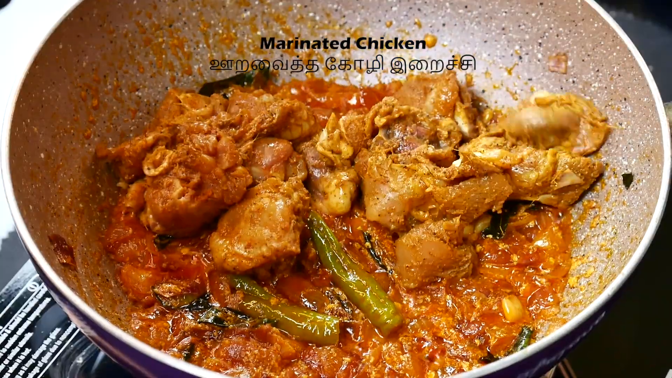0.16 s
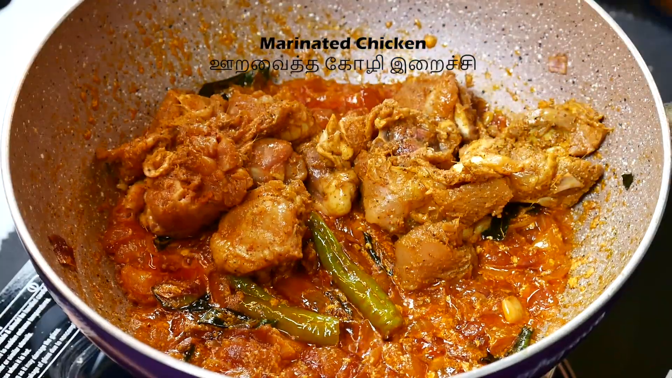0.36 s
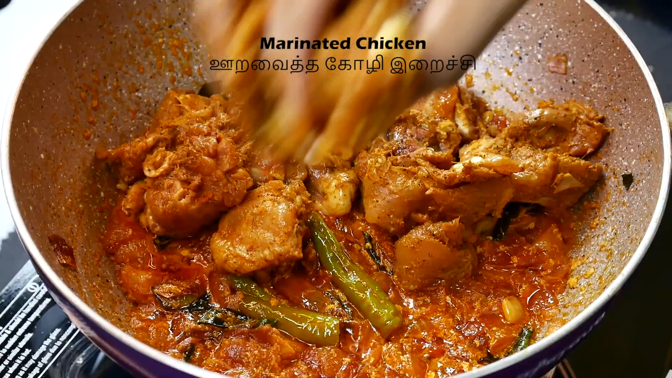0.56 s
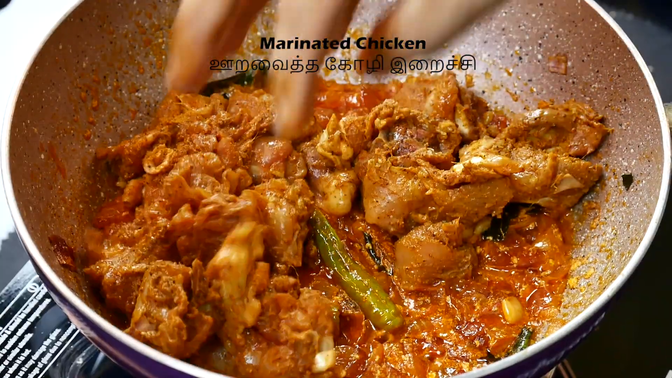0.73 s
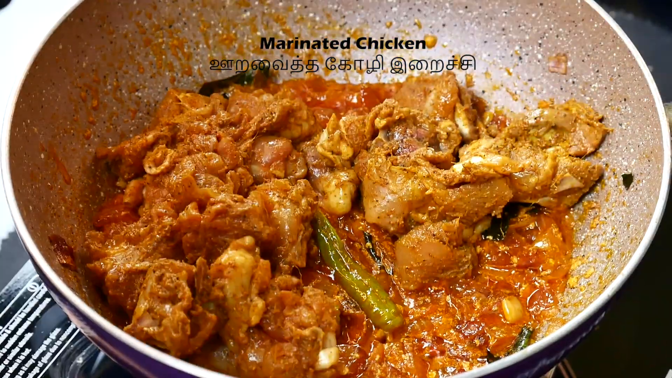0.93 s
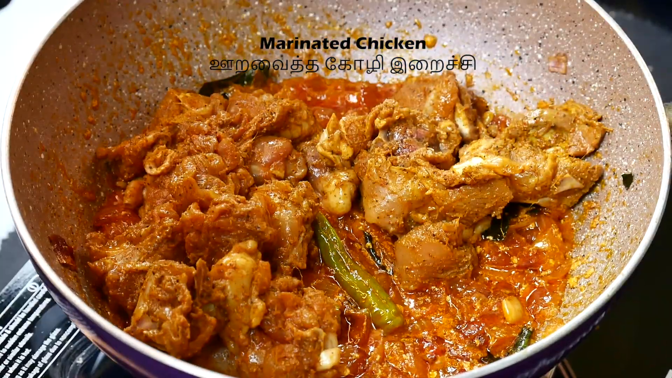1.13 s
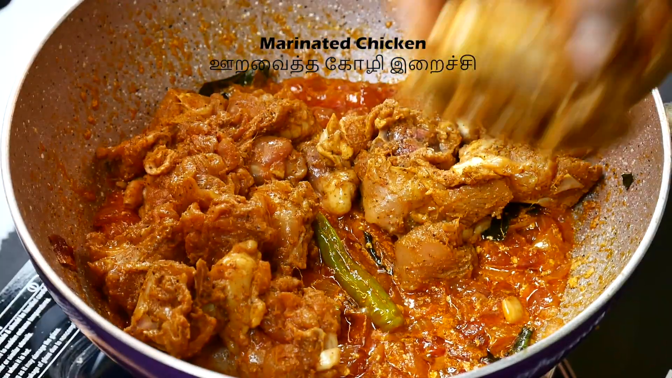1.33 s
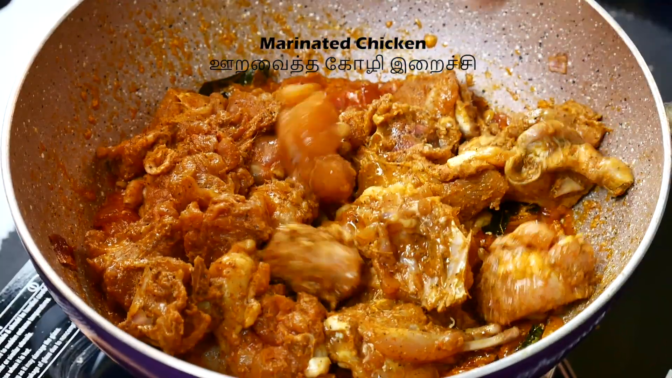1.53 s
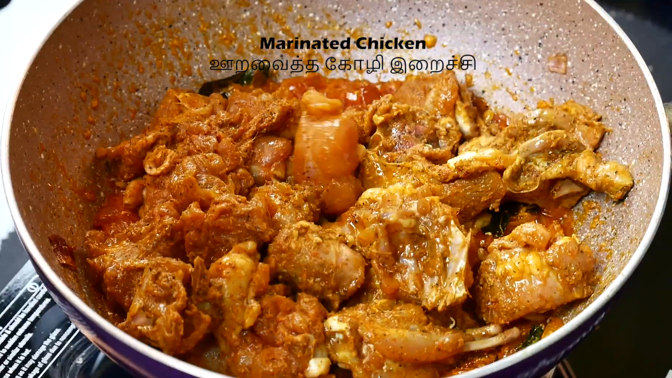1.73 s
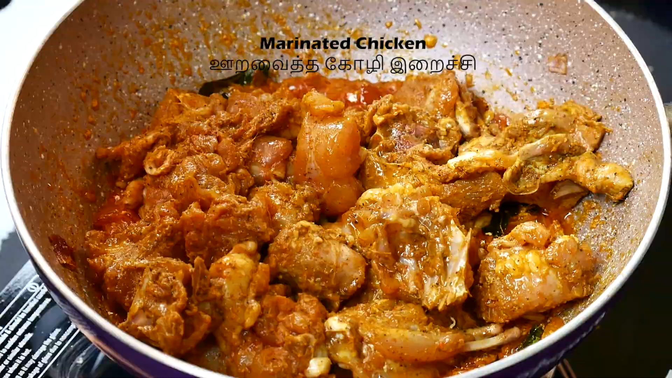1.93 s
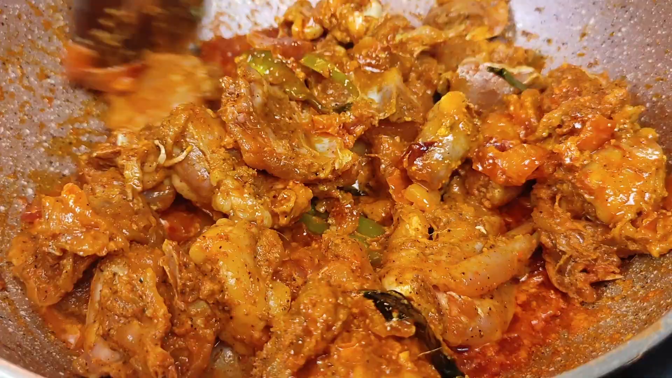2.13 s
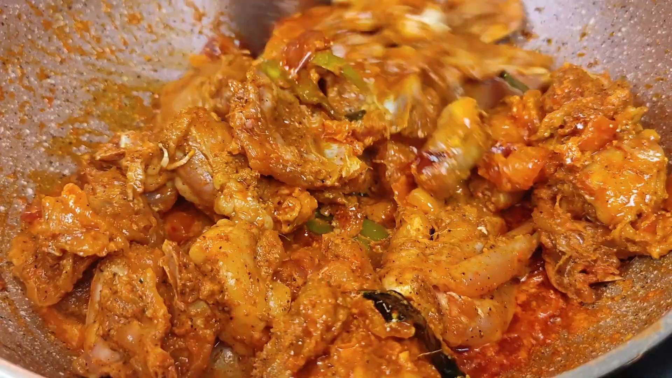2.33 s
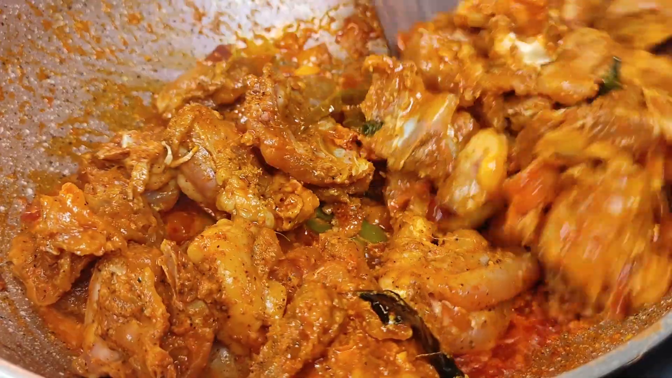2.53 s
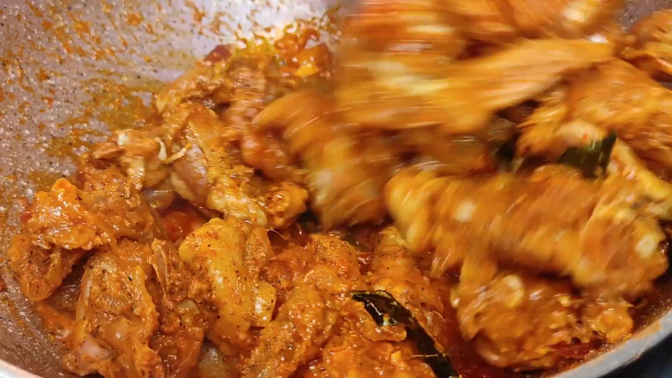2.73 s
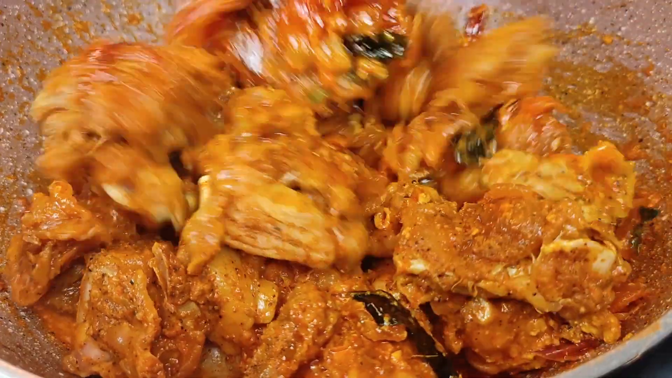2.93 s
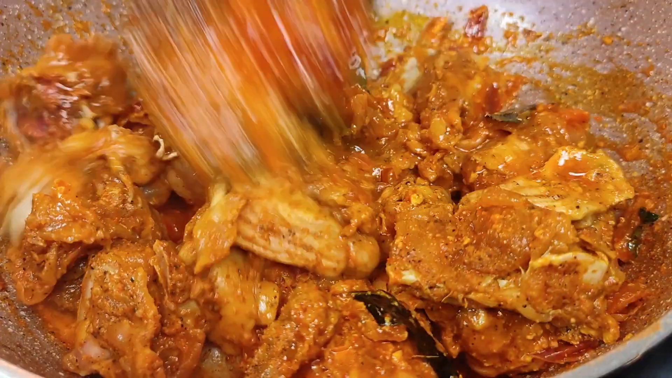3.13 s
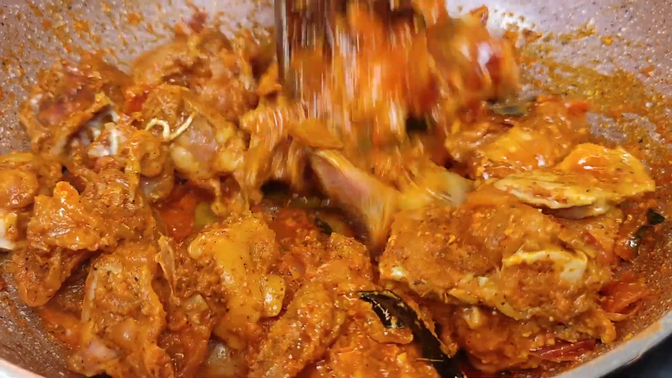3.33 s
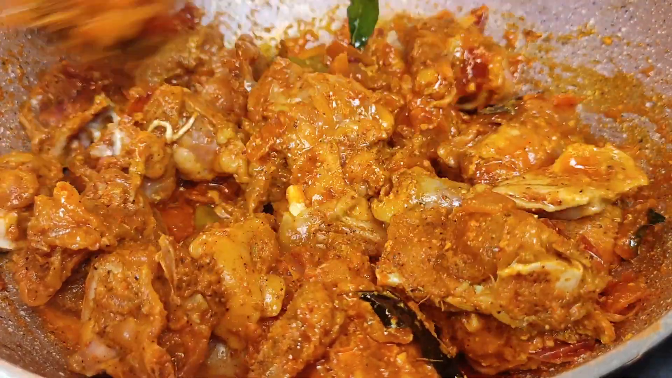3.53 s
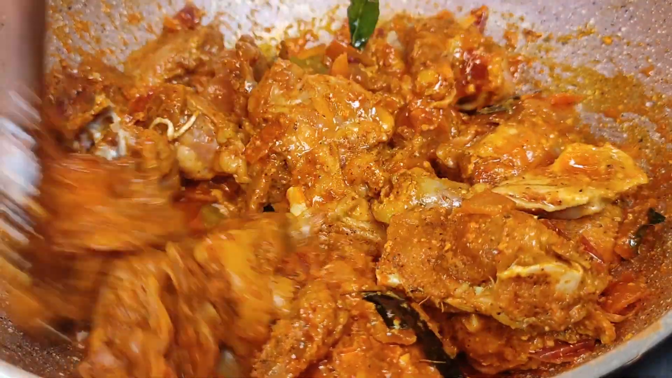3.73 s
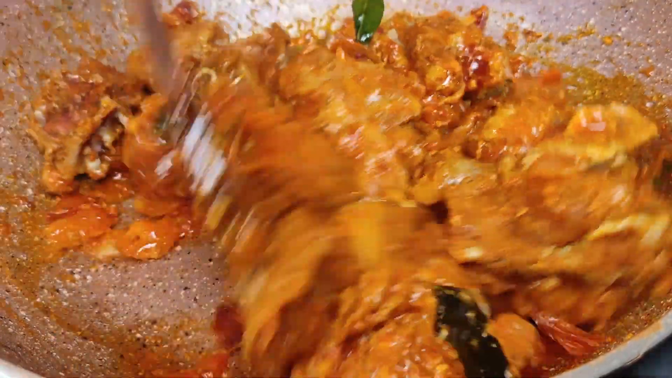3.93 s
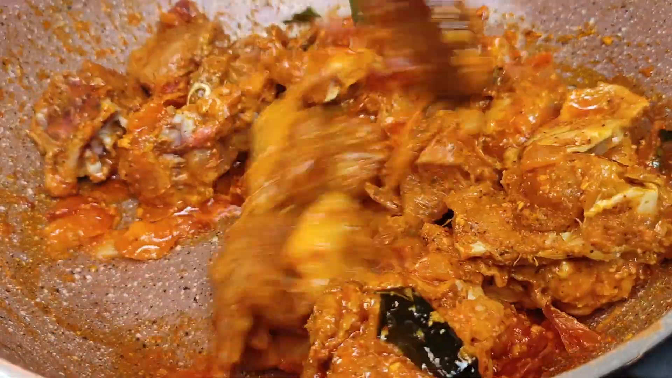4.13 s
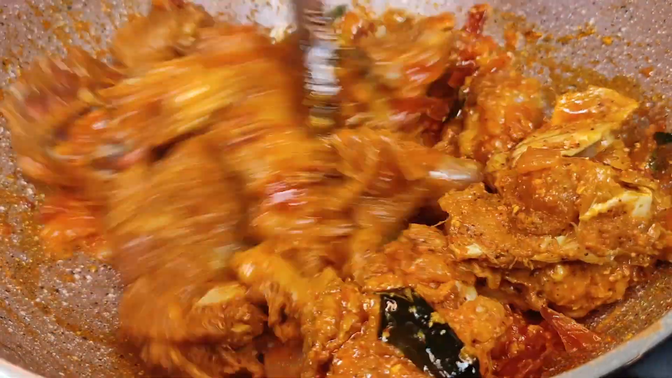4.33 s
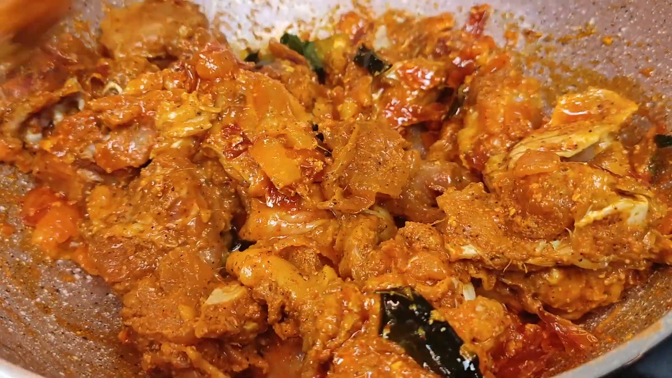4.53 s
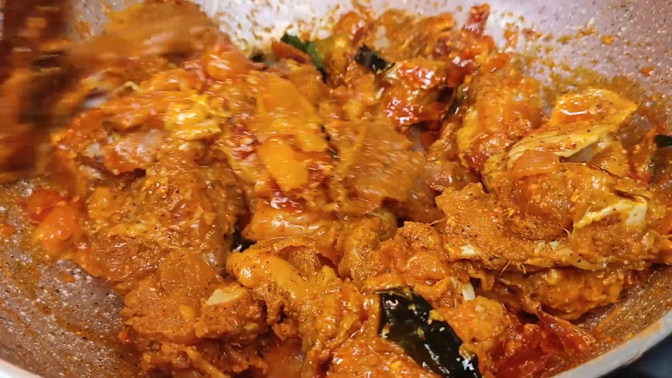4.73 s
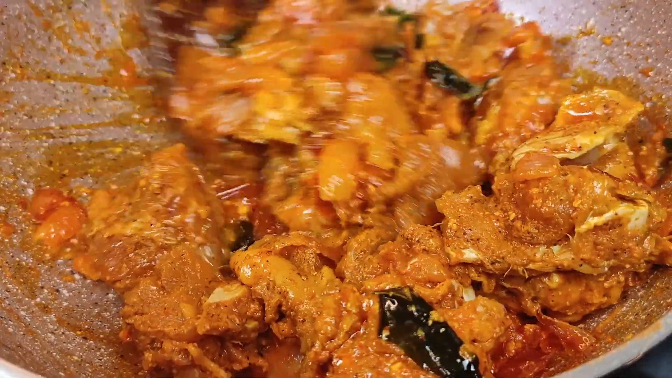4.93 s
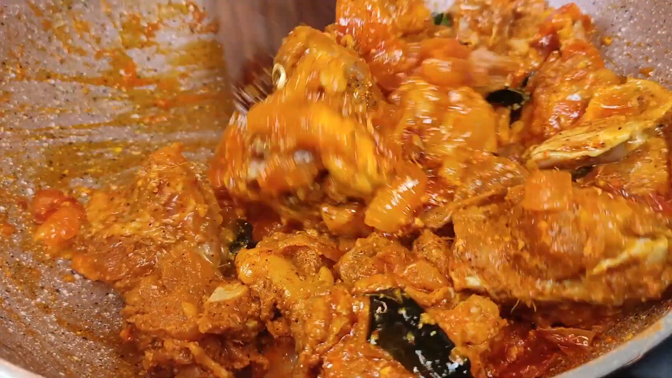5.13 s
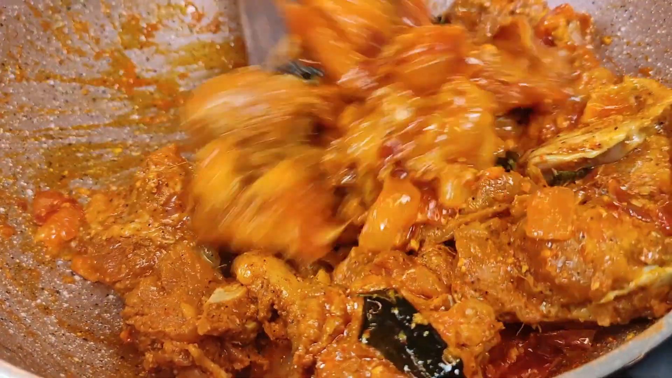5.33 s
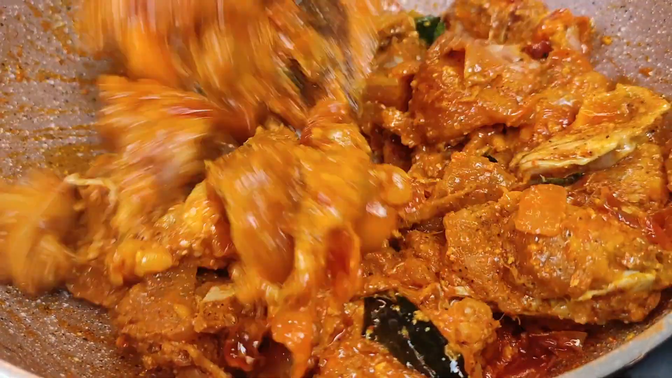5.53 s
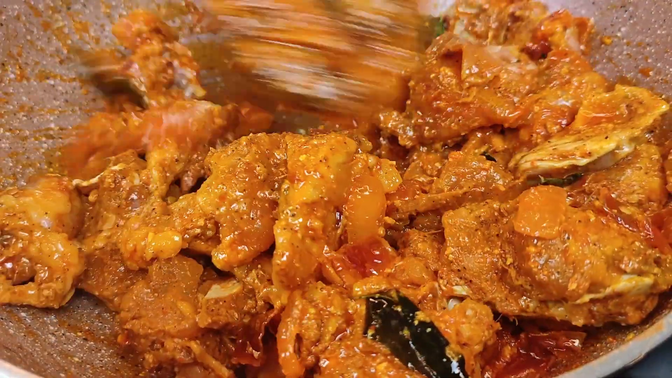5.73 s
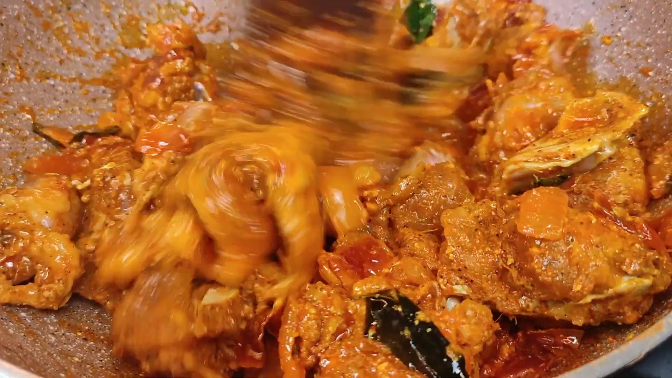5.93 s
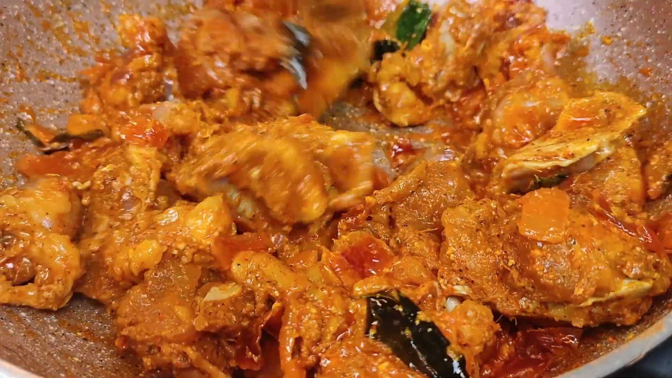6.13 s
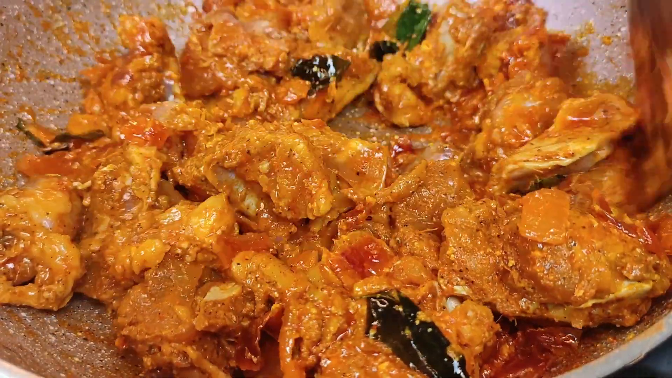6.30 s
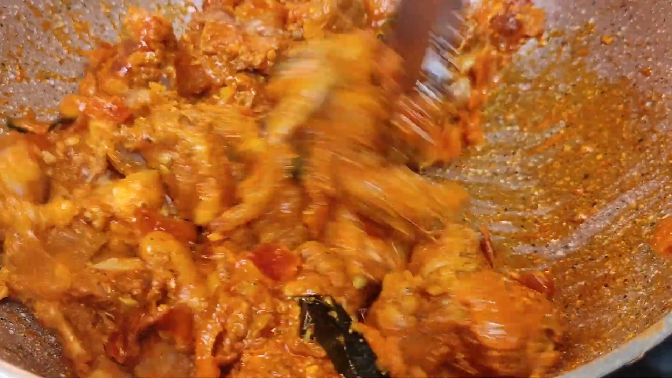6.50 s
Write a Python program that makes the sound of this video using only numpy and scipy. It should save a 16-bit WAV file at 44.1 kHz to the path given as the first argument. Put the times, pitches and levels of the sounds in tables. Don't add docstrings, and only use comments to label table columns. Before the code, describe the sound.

Close wet plops of meat landing in oily sauce, followed by dull wooden knocks and pan scrapes amid increasingly lively, crackling frying and a low hum.

```python
import sys
import numpy as np
from scipy import signal
from scipy.fft import rfft, irfft, next_fast_len
from scipy.io import wavfile

SR = 44100
rng = np.random.default_rng(int(sys.argv[2]) if len(sys.argv) > 2 else 0)


def to_wav(sig):
    pcm = np.clip(np.atleast_2d(sig), -1, 1) * 32767
    pcm = np.round(pcm).astype(np.int16)
    wavfile.write(sys.argv[1], SR, pcm.T)


def amplitude_ratio(level_db):
    exponent = np.asarray(level_db, float) / 20
    return 10 ** exponent


N = 293706


def rms_one(x):
    return x / np.sqrt(np.mean(x ** 2) + 1e-20)


def in_time(rows):
    s, *columns = np.transpose(rows)
    return np.array([np.interp(np.arange(N) / SR, s, c) for c in columns])


def at_hz(points, hz):
    points_hz, points_db = np.transpose(points)
    return np.interp(np.log(hz), np.log(points_hz), points_db)


def coloured(x, spectrum):
    hz = np.maximum(np.fft.rfftfreq(N, 1 / SR), 1)
    return irfft(rfft(x) * amplitude_ratio(at_hz(spectrum, hz)), N)


def shares(centres, hz):
    return np.array([np.interp(np.log(hz), np.log(centres), row) for row in np.eye(len(centres))])


def drift(rate_hz):
    r = np.exp(-2 * np.pi * rate_hz * 40 / SR)
    slow = signal.lfilter([1], [1, -2 * r, r * r], rng.standard_normal(N // 40 + 2002))
    slow = slow[2000:]
    return np.interp(np.arange(N) / 40, np.arange(len(slow)), rms_one(slow - slow.mean()))


def ring(clicks, hz, t60):
    r = np.exp(-np.log(1000) / (t60 * SR))
    w = 2 * np.pi * hz / SR
    return signal.lfilter([0, np.sin(w)], [1, -2 * r * np.cos(w), r * r], clicks + 1e-18)


def band(x, low_hz, high_hz):
    return signal.sosfilt(signal.butter(2, [low_hz, high_hz], "band", fs=SR, output="sos"), x)


def grains(per_s, spread_db):
    where, chance, size, sign = rng.random((4, N // 4))
    kept = chance < per_s * 4 / SR
    out = np.zeros(N)
    height = amplitude_ratio(-spread_db * np.log(size[kept] + 0.0042))
    out[(where[kept] * N).astype(int)] = height * np.sign(sign[kept] - .5)
    return rms_one(out)


# pitch in Hz, level in dB per Hz.
ROAR_COLOUR = [(18, -60), (30, -28), (70, -30), (97, -41), (171, -24), (208, -11.5), (413, -7.5),
               (471, -25), (517, -8.5), (552, -3), (700, -6), (910, -65), (1540, -120)]
ROAR_DB = -53
FAN_HZ, FAN_WIDTH_HZ, FAN_DB = 99, 38, -63.5


def hum():
    roar = rms_one(coloured(rng.standard_normal(N), ROAR_COLOUR))
    drone = rms_one(ring(rng.standard_normal(N), FAN_HZ, 0.81 / FAN_WIDTH_HZ))
    return amplitude_ratio(ROAR_DB + 1.0 * drift(1.9)) * roar + amplitude_ratio(FAN_DB) * drone


KITCHEN_T60_S, WALL_CUT_HZ = 0.24, 5000


def kitchen(x):
    size = next_fast_len(N + SR)
    phase = -2j * np.pi * np.fft.rfftfreq(size)
    dull = np.exp(-2 * np.pi * WALL_CUT_HZ / SR)
    wall = (1 - dull) / (1 - dull * np.exp(phase))
    echo = 0
    for k, lag in enumerate((rng.uniform(.008, .035, 10) * SR).astype(int)):
        fade = np.exp(-np.log(1000) * lag / SR / KITCHEN_T60_S)
        loop = fade * wall * np.exp(phase * lag)
        echo = echo + (-1) ** k * loop / (1 - loop)
    return irfft(rfft(x, size) * echo, size)[:N]


# time in seconds, vigour in dB, sauce thickness in dB.
FRY = [(0.0, -37.5, -2), (0.24, -37, -1), (0.39, -38.5, -1), (1.5, -41, 0.5), (1.65, -39, 0.5),
       (2.19, -41, 0.5), (2.47, -33, -0.5), (2.65, -32.5, 4), (3.52, -29.5, 1), (3.88, -26, 0.5),
       (4.38, -29, 0.5), (4.6, -28, 0), (5.27, -26.5, 1), (5.43, -28, 0), (6.05, -28.5, 0.5),
       (6.23, -28, 2), (6.66, -27.5, -0.5)]
SIZE_HZ = [900, 2000, 3500, 8000]
VIGOUR_SHARE = [.7, 1.035, 1.025, 0.98]
THICKNESS_SHARE = [1.0, .3, 0.0, -1.0]
# middle in seconds, half length in seconds, change in dB, pitch in Hz of the bubbles most affected.
FLARES = [(2.4, 0.038, 7, 980), (2.81, 0.16, 7, 7900), (2.947, 0.11, -7, 1740), (3.1, 0.13, 5.5, 7000),
          (2.9, 0.11, 1, 2140), (3.72, 0.053, 1, 8000), (3.87, 0.14, -3, 2100), (4.5, 0.07, 4.5, 4970),
          (4.665, 0.072, 5.5, 5900), (4.675, 0.057, 3, 2000), (3.45, 0.11, 2, 4900), (3.9, 0.1, 0, 3700),
          (4.53, 0.042, 2, 4000), (3.72, .08, -1.5, 1800), (2.49, 0.048, -6, 2000), (2.39, .1, -2, 11000),
          (4.4, .08, -0.5, 6900), (3.6, .06, -2, 11000), (4.6, 0.019, 5, 2300), (5.313, 0.058, 3, 5000),
          (5.453, 0.15, -2, 4000), (5.77, 0.04, 5.5, 1223), (5.8, 0.072, 1, 6300), (6.164, 0.053, 3, 3500),
          (6.457, 0.062, -0.5, 4000)]
FLARE_REACH_OCTAVES = 0.93


def bubble_sizes():
    vigour_db, thickness_db = in_time(FRY)
    out = np.outer(VIGOUR_SHARE, vigour_db) + np.outer(THICKNESS_SHARE, thickness_db)
    t = np.arange(N) / SR
    for s, half, db, hz in FLARES:
        octaves = np.log2(np.divide(SIZE_HZ, hz))
        reach = np.exp(-(octaves / FLARE_REACH_OCTAVES) ** 2)
        out += db * np.outer(reach, np.exp(-((t - s) / half) ** 2))
    return out


# pitch in Hz, level in dB per Hz.
FRY_COLOUR = [(330, -35), (500, -19.5), (570, -17), (667, -17), (830, -4.5), (1150, -4), (1600, -7.5),
              (2150, -3.5), (2550, -4), (3250, -1.5), (3800, -5.5), (5500, -12), (9300, -22.5),
              (15600, -29)]
CHANCE_SWELL = .4


def frying(per_cycle, spread_db, hiss, crackle, patchy_db):
    lively = slice(int(4.2 * SR), int(6 * SR))
    sizes_db, together = bubble_sizes(), drift(3.0)
    sizes_db = sizes_db - sizes_db[:, lively].mean(axis=1, keepdims=True)
    snaps = crackle * grains(500, spread_db=3.0)
    steam = hiss * rng.standard_normal((2, N)) + snaps
    edges = 420 * 2 ** np.arange(0, 5.45, .2)
    out = 0
    for k, (low, high) in enumerate(zip(edges, edges[1:])):
        hz = np.sqrt(low * high)
        patches_db = patchy_db * (CHANCE_SWELL * together + drift(11.3))
        level_db = shares(SIZE_HZ, hz) @ sizes_db + patches_db
        bubbles = grains(per_cycle * hz, spread_db)
        out = out + amplitude_ratio(level_db) * band(bubbles + steam[k % 2], low, high)
    out = coloured(out, FRY_COLOUR)
    return amplitude_ratio(-27.0) * out / np.std(out[lively])


# start in seconds, peak in dB, pitch in Hz, spray in dB.
SPITS = [(0.0387, -21, 2160, -2), (0.0442, -13.5, 2300, -5.5), (0.131, -27, 3340, -15),
         (0.2294, -27, 4530, 1), (0.244, -20, 4000, -16), (0.4326, -24, 3900, -24), (0.600, -38, 3280, 9),
         (0.6375, -19.5, 3380, -20), (2.0714, -23, 2740, -12), (2.191, -18.5, 2893, -36),
         (2.4244, -13.5, 3040, -26), (2.5116, -20, 3480, -21), (3.024, -26, 3480, -0.5),
         (3.053, -9, 1945, -11), (4.5254, -21, 3260, -27), (6.0676, -11, 3640, -29)]
SPIT_DYING_S = 0.018
# start in seconds, peak in dB, splash length in seconds, spray in dB, pitch in Hz of the biggest pocket.
SLAPS = [
    (.0536, -21.5, 0.067, -1.5, 3320),
    (0.7359, -9.5, .031, -24, 2000),
    (1.4707, -12.5, .054, -13, 3400),
]
# share of its length, level in dB, pitch in Hz, dying time in seconds.
SPLASH = [(0, -2, 3430, 0.032), (0.139, -5, 3470, 0.065), (.48, -6, 3240, 0.036), (0.992, -12, 3400, 0.059)]
POCKET_AT, POCKET_DB, POCKET_DYING_S = .28, -3, 0.032


def bursts():
    rows = [(s, db, hz, SPIT_DYING_S, spray_db) for s, db, hz, spray_db in SPITS]
    for s, peak_db, length, spray_db, pocket_hz in SLAPS:
        pops = SPLASH + [(POCKET_AT, POCKET_DB, pocket_hz, POCKET_DYING_S)]
        rows += [(s + share * length, peak_db + db, hz, dying, spray_db) for share, db, hz, dying in pops]
    return rows


SPRAY_OUTLASTS = .5


def spits(cycles):
    out, t = np.zeros(N), np.arange(5000) / SR
    opening = 1 - np.exp(-t / .001)
    rows = bursts()
    for (s, peak_db, hz, dying, spray_db), drops in zip(rows, rng.standard_normal((len(rows), len(t)))):
        fade = np.exp(-np.log(1000) * t / max(dying, .002))
        pop = fade * rms_one(ring(drops, hz, cycles / hz))
        spray = amplitude_ratio(spray_db) * fade ** SPRAY_OUTLASTS * rms_one(band(drops, 1400, 5400))
        out[round(s * SR):][:len(t)] += amplitude_ratio(peak_db - 5.0) * (pop + spray) * opening
    return out


# start in seconds, length in seconds, dB above the resting load.
STROKES = [
    (0.0, 0.22, 7.5),
    (1.598, 0.085, 4.5),
    (2.35, 0.12, 5.5),
    (2.95, 0.14, 8),
    (3.497, 0.26, 12.5),
    (4.1, 0.61, 5),
    (5.197, 0.089, 8.5),
    (6.16, .1, 14.5),
]
RESTING_DB, STROKE_RISE_S, STROKE_FALL_S = -45, 0.045, 0.27


def load():
    t = np.arange(N) / SR
    strokes_db = []
    for s, length, db in STROKES:
        rise = 1 + (t - s) / STROKE_RISE_S
        fall = 1 - (t - s - length) / STROKE_FALL_S
        strokes_db.append(db * np.clip(np.minimum(rise, fall), 0, 1))
    return RESTING_DB + np.max(strokes_db, axis=0)


def drag():
    slips = band(grains(400, spread_db=5.0), 92, 730)
    return rms_one(slips) * amplitude_ratio(load() - 52.5)


# start in seconds, edge in dB, edge pitch in Hz, weight in dB, weight lag in seconds.
KNOCKS = [
    (0.0546, -13.5, 1000, -13, 0.0054),
    (2.221, -14, 990, -18, .007),
    (2.4255, -19.5, 1000, -28, 0.0085),
    (3.4792, -18.5, 1020, -17.5, 0.0092),
    (4.0609, -21, 865, -18, 0.0028),
    (5.085, -24, 890, -24, .004),
    (6.040, -14.5, 904, -17, 0.0068),
    (6.226, -22.5, 800, -28, 0.016),
]
# delay in weight lags, level in dB, share of its pitch, swings, ring in dB.
EDGE = [(0, -1, 1.07, 2.2, 2.5), (0.601, -1.5, 1.053, 5.6, -24), (1.9, -2, 0.72, 1.9, -10.5),
        (5.5, -25, 1.4, 7.1, -13)]
# delay in seconds, level in dB, pitch in Hz, swings, ring in dB.
WEIGHT = [(-.002, -7, 337, 3.9, -12.5), (0, -2.5, 217, 3.2, -13.5), (.005, -12.5, 120, 0.86, 3.5),
          (.015, -15.5, 228, 3, 6.5)]
# start in seconds, peak in dB, pitch in Hz, ring in dB.
TAPS = [(.0415, -27, 890, 11.5), (0.0551, -11.5, 964, -12), (.0575, -17, 622, -17), (.099, -31, 1040, -17),
        (0.23, -27, 4320, -20), (0.239, -32, 1230, -11), (.751, -17, 1236, 5), (1.472, -18, 1155, 10.5),
        (1.483, -23, 1297, 10), (2.248, -31, 724, -10), (2.491, -32, 1020, -11), (3.0265, -31, 2400, -15),
        (3.055, -18, 3330, -14), (3.058, -29, 605, 12.5), (3.505, -26, 610, 6), (3.4815, -19, 1950, -7),
        (3.4811, -18, 1060, -15), (3.490, -14, 1008, 5.5), (3.87, -27.5, 594, 1), (4.060, -18.5, 1800, -4),
        (4.065, -22.5, 565, -1), (4.102, -24, 949, -7), (5.096, -24, 926, -1), (5.256, -32.5, 778, 13),
        (6.249, -23, 965, -17), (6.262, -33, 603, -15), (6.361, -39, 810, 16)]
# start in seconds, peak in dB, pitch in Hz, ring in dB.
NUDGES = [(0.154, -35.5, 192, -6), (0.281, -41, 202, -23), (.756, -32, 140, 2), (1.478, -28, 123, -10),
          (1.496, -39, 260, -9), (1.534, -27.5, 124, -10), (1.536, -31, 254, -11), (1.728, -37.5, 125, -9),
          (1.734, -34.5, 356, -6), (3.065, -31, 120, -3), (3.598, -34, 216, -1), (3.627, -34.5, 234, -4),
          (3.691, -33, 242, -8), (3.713, -31, 209, -7), (3.733, -28.5, 231.3, -10), (3.894, -32.5, 304, 9),
          (4.069, -32, 100, -2), (4.072, -21.5, 352, -3), (4.080, -29, 364, -3), (5.085, -21.5, 330, -10),
          (4.591, -39, 207, 7), (5.105, -32, 246, 10), (5.254, -32, 157, -10), (6.054, -26, 240, 17.5)]
TAP_SWINGS_AT_200_HZ, TAP_SWINGS_GROWTH = 2.54, 0.34


def contacts():
    rows = []
    for s, db, hz, ring_db in TAPS + NUDGES:
        swings = TAP_SWINGS_AT_200_HZ * (hz / 200) ** TAP_SWINGS_GROWTH
        rows.append((s, db, hz, swings, ring_db))
    for s, edge_db, edge_hz, weight_db, lag in KNOCKS:
        for late, db, share, swings, ring_db in EDGE:
            rows.append((s + late * lag, edge_db + db, edge_hz * share, swings, ring_db))
        for late, db, hz, swings, ring_db in WEIGHT:
            rows.append((s + lag + late, weight_db + db, hz, swings, ring_db))
    return rows


# pitch in Hz, level in dB, t60 in seconds.
PAN = [(105.4, 0.5, 0.065), (140, -23, 0.032), (200, -3.5, 0.053), (233.4, -7, 0.2), (279, -11, 0.092),
       (361, 2, 0.022), (463, -4.5, 0.065), (612, -6.5, 0.26), (733, 0, 0.069), (810, -4, 0.049),
       (936, -17, 0.18), (1048, -4, 0.021), (1342, -10, 0.15), (2160, -6.5, 0.063), (3180, -16, 0.29)]


def pan(rubbing):
    knock, push = np.zeros(N), rubbing.copy()
    for s, peak_db, hz, swings, ring_db in contacts():
        turn = np.arange(int(2 * swings * SR / hz)) * hz / SR
        rise = turn / (swings / 4)
        swell = rise * np.exp(1 - rise)
        pulse = amplitude_ratio(peak_db) * swell * np.sin(2 * np.pi * turn)
        knock[round(s * SR):][:len(turn)] += pulse
        push[round(s * SR):][:len(turn)] += amplitude_ratio(ring_db - 6.0) * 2 * pulse / swell.sum()
    return knock + sum(amplitude_ratio(level_db) * ring(push, hz, t60) for hz, level_db, t60 in PAN)


def scene():
    sauce = frying(per_cycle=.2, spread_db=3.0, hiss=1.0, crackle=0.81, patchy_db=1.3)
    hits = pan(drag() + amplitude_ratio(-45) * sauce) + spits(cycles=13.0)
    sound = sauce + hits + amplitude_ratio(-14.0) * kitchen(hits) + hum()
    return np.array([sound, sound])


def low_pass(x):
    return signal.sosfilt(signal.butter(12, 15720, fs=SR, output="sos"), x)


def record(dry):
    port = signal.sosfilt(signal.butter(3, 42, "high", fs=SR, output="sos"), dry)
    return low_pass(port)


dry = scene()
out = record(dry)
to_wav(out)
```